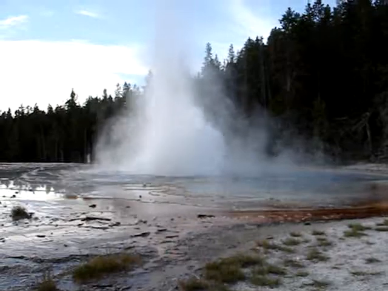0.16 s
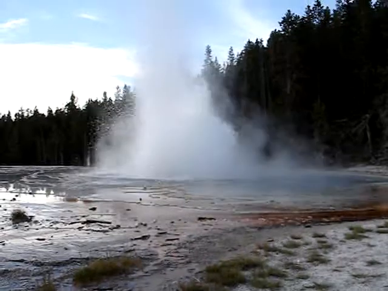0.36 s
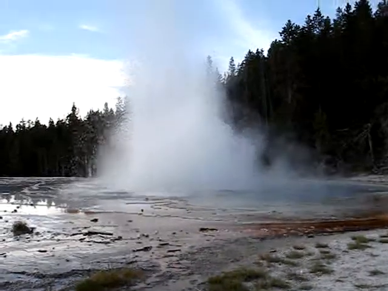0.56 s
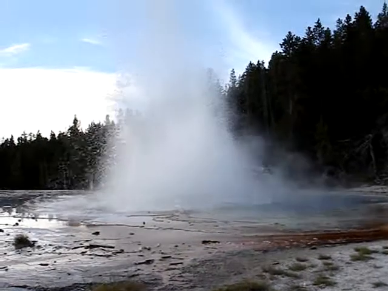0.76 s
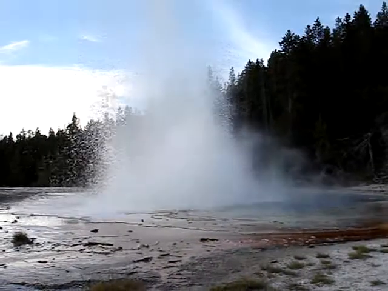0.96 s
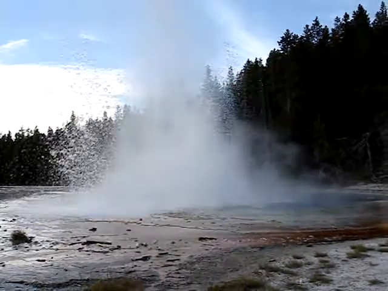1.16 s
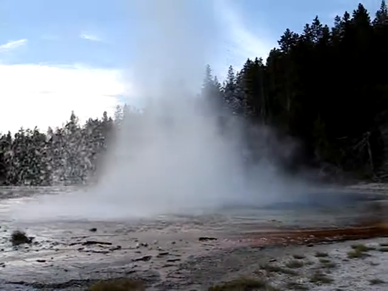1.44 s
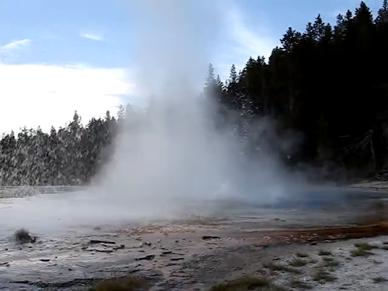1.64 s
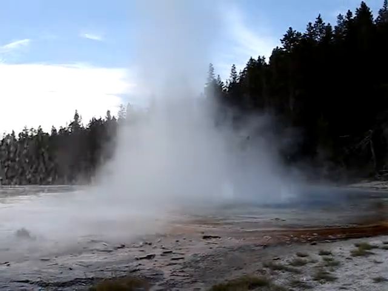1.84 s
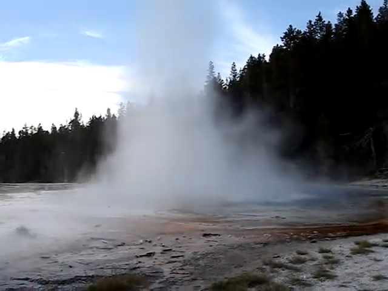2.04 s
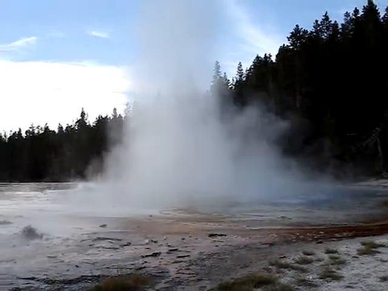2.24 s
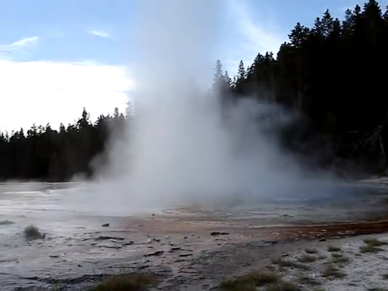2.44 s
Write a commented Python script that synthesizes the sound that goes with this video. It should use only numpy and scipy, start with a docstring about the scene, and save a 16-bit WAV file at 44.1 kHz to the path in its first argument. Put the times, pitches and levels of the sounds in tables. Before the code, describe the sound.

Geyser eruption: sudden roar of steam and water, dense falling splatter, sharp close drops, then faint simmer

```python
"""A sudden burst from a geyser's pool: a low roar of steam and water swells into a bright rush.
The thrown water then lands as a dense splatter that thins to single drops and stops.
The pool simmers steadily underneath: shaped noise, like the roar, rush and mist; drops are random impacts.
A gust brushes the microphone, and ticks of the nearest drops make the limiter duck."""
import sys
import numpy as np
from scipy import signal
from scipy.fft import rfft, irfft, next_fast_len
from scipy.io import wavfile
from scipy.ndimage import uniform_filter1d

SR = 44100
rng = np.random.default_rng(int(sys.argv[2]) if len(sys.argv) > 2 else 0)


def int16_out(signal):
    """Quantize to a 16-bit WAV file."""
    q = np.round(np.clip(np.atleast_2d(signal).T, -1, 1) * 32767)
    wavfile.write(sys.argv[1], SR, q.astype(np.int16))


N = 114660
T = np.arange(N) / SR   # time in seconds


def from_db(db):
    """Amplitude factor of a level in dB."""
    return 10 ** (np.asarray(db) / 20)


def rms_one(x):
    """Scale to an RMS of 1."""
    return x / np.sqrt(np.mean(x ** 2) + 1e-20)


def in_time(rows):
    """Each column of a table after the first (seconds), joined by straight lines over time."""
    seconds, *columns = np.transpose(rows)
    return [np.interp(T, seconds, column) for column in columns]


def drift(rate_hz):
    """Slow random movement with an RMS of 1: noise through two equal one-pole lowpasses."""
    step = 40   # samples between computed points
    r = np.exp(-2 * np.pi * rate_hz * step / SR)
    raw = rng.standard_normal(N // step + 2002)
    slow = signal.lfilter([1], [1, -2 * r, r * r], raw)[2000:]   # drop the filter's settling
    return np.interp(np.arange(N) / step, np.arange(len(slow)), rms_one(slow))


def shaped(x, spectrum):
    """Causal (minimum-phase) filter with the given spectrum; keeps the power of white noise."""
    size = 2 * next_fast_len(N)
    half = size // 2
    hz, db = np.transpose(spectrum)
    bin_hz = np.arange(half + 1) * SR / size
    gain = rms_one(from_db(np.interp(np.log(bin_hz + 1), np.log(hz), db)))
    # folding the cepstrum onto positive times gives the minimum phase
    cepstrum = irfft(np.log(gain))
    cepstrum[1:half] *= 2
    cepstrum[half + 1:] = 0
    response = np.exp(rfft(cepstrum))
    return irfft(rfft(x, size) * response)[:N]


def noise(spectrum):
    """White noise coloured by a spectrum, at an RMS of about 1."""
    return shaped(rng.standard_normal(N), spectrum)


def patter(per_s, spread_db):
    """Random impacts of uneven size and either sign, with a mean power of 1 at any rate."""
    size_db = spread_db * np.clip(rng.standard_normal(N), -3, 2)
    sizes = rms_one(from_db(size_db)) * rng.choice([-1, 1], N)
    chance = np.clip(per_s / SR, 1e-4, 1)   # of an impact on each sample
    return sizes * (rng.random(N) < chance) / np.sqrt(chance)


# The jet from the vent. Each row: time in seconds, level of the low roar in dB, level of the mid rush in dB.
JET_LEVELS = [(.08, -31.5, -45), (.17, -27.5, -30.5), (.26, -28, -33.5), (.41, -26.5, -32),
              (.52, -28, -28.5), (.67, -28.5, -24), (.74, -25.5, -22), (.84, -25, -23), (1.0, -24, -22),
              (1.16, -28, -22.5), (1.31, -31, -23.5), (1.46, -34, -30.5), (1.64, -37.5, -31.5),
              (1.76, -44.5, -37.5), (2.0, -45, -40.5), (2.22, -52.5, -44.5), (2.42, -57, -63),
              (2.6, -72, -83)]
# Slugs of water leaving the vent. Each row: centre in seconds, lift of the roar in dB, lift of the rush in dB.
SLUGS = [(0.096, 2.4, 5), (.172, 2.7, 2.9), (.247, 2, 1), (.32, 1.1, 1.2), (.402, 2.7, 0.45),
         (.728, 0.96, 2.9), (1.035, 0.45, 1.5)]
SLUG_S = 0.012   # standard deviation of each lift in time
# Colour of the roar. Each row: frequency in Hz, relative density in dB.
ROAR_SPECTRUM = [(30, -30), (80, -15.5), (150, -7.5), (250, -3), (400, -1.5), (650, 2.5), (900, -4),
                 (1400, -9), (3000, -12.5), (10000, -69.5)]
# Colour of the rush. Each row: frequency in Hz, relative density in dB.
RUSH_SPECTRUM = [(200, -22), (500, -7), (900, -2), (1300, -1), (2000, 0.5), (2800, 0), (4500, -7.5),
                 (10000, -29)]
GURGLE_SHARE = 0.085   # share of the roar's power


def jet(surge_db):
    """Steam tears through the pool in quick surges: a low, gurgling roar and a brighter rush."""
    roar_db, rush_db = in_time(JET_LEVELS)
    surge = surge_db * drift(22)
    for s, roar_lift_db, rush_lift_db in SLUGS:
        slug = np.exp(-.5 * ((T - s) / SLUG_S) ** 2)
        roar_db = roar_db + roar_lift_db * slug
        rush_db = rush_db + rush_lift_db * slug
    steady_roar = churn(ROAR_SPECTRUM, flutter_db=1.96, flutter_hz=40)
    roar = np.sqrt(1 - GURGLE_SHARE) * steady_roar + np.sqrt(GURGLE_SHARE) * gurgles()
    rush = churn(RUSH_SPECTRUM, flutter_db=1.56, flutter_hz=89.5)
    return from_db(roar_db + surge) * roar + from_db(rush_db + surge) * rush


def churn(spectrum, flutter_db, flutter_hz, count=6):
    """Turbulence: overlapping bands of noise that each flutter on their own."""
    source = rfft(noise(spectrum))
    bin_hz = np.arange(len(source)) * SR / N
    # band number of each bin, evenly spaced in log frequency
    place = np.interp(np.log(bin_hz + 1), np.log([200, 6400]), [0, count - 1])
    out = 0
    for k in range(count):
        band = irfft(source * np.maximum(1 - abs(place - k), 0), N)
        out = out + band * rms_one(from_db(flutter_db * drift(flutter_hz)))
    return out


GURGLES_PER_S = 120
GURGLE_LOW_HZ, GURGLE_HIGH_HZ = 319.8, 1311   # range of starting pitches
GURGLE_CYCLES, GURGLE_RISE = 4.86, 0.056   # decay time in cycles; fractional pitch rise per decay time


def gurgles():
    """Pockets of steam break the surface, each ringing for a few cycles at a rising pitch."""
    out = np.zeros(N)
    for start, place in rng.random((int(GURGLES_PER_S * N / SR), 2)):
        hz = GURGLE_LOW_HZ * (GURGLE_HIGH_HZ / GURGLE_LOW_HZ) ** place
        first = int(start * N)
        cycles = hz * T[:min(N - first, SR // 10)]
        age = cycles / GURGLE_CYCLES
        envelope = (1 - np.exp(-cycles)) * np.exp(-age)
        ring = np.sin(2 * np.pi * cycles * (1 + GURGLE_RISE * age / 2))
        out[first:first + len(age)] += envelope * ring
    return rms_one(out)


# Water falling around the pool. Each row: time in seconds, level of splashes in dB, level of fine spray in dB.
FALL_LEVELS = [(.08, -40.5, -54), (.17, -46, -43), (.28, -41, -44.5), (.5, -32.5, -35.5), (.73, -31, -29.5),
               (.81, -34, -30.5), (1.0, -23.5, -28), (1.15, -33.5, -27.5), (1.39, -27.5, -28.5),
               (1.52, -24, -30), (1.69, -25, -29.5), (1.77, -29, -32), (1.92, -27, -30.5),
               (2.04, -31.5, -31), (2.18, -31.5, -29.5), (2.31, -36, -34.5), (2.39, -43, -36.5),
               (2.44, -60, -63), (2.6, -68, -68)]
# How thickly the spray falls. Each row: time in seconds, drops per second.
DROP_RATE = [(0, 12400), (1.4, 12000), (2.15, 4000), (2.42, 1400)]
# Colour of the splashes. Each row: frequency in Hz, relative density in dB.
SPLASH_SPECTRUM = [(300, -27.5), (1000, -21), (2100, -12), (2800, -1.5), (3500, -2), (4600, -7),
                   (7000, -10), (10000, -20)]
# Colour of the spray. Each row: frequency in Hz, relative density in dB.
SPRAY_SPECTRUM = [(500, -26), (2000, -11), (3000, -11.5), (4200, -5.5), (5000, -3), (6200, -1.5),
                  (8200, -2), (10000, -10)]
DROP_SPREAD_DB, MIST_SHARE = 5, 0.26   # spread of drop sizes; share of the power that is smooth hiss


def falling_water(clump_db, clump_hz):
    """Drops land in clumps on pool and crust: ringing splashes and finer, brighter spray."""
    splash_db, spray_db = in_time(FALL_LEVELS)
    per_s, = in_time(DROP_RATE)
    clumps = from_db(clump_db * drift(clump_hz)) * splats(per_s / per_s.mean())
    layers = ((splash_db, SPLASH_SPECTRUM, .6 * per_s),   # splashes are fewer than spray drops
              (spray_db, SPRAY_SPECTRUM, per_s))
    out = 0
    for level_db, spectrum, rate in layers:
        drops = np.sqrt(1 - MIST_SHARE) * patter(rate, DROP_SPREAD_DB)
        mist = np.sqrt(MIST_SHARE) * rng.standard_normal(N)
        out = out + shaped((drops + mist) * from_db(level_db) * clumps, spectrum)
    return out


SPLATS_PER_S, SPLAT_S = 650, 0.00062   # mean rate of blobs; decay time of each shower
SPLAT_SHARE = 0.47   # share of the power


def splats(thickness):
    """Gain of the patter: each blob that lands sheds a brief shower of droplets."""
    blobs = patter(SPLATS_PER_S * thickness, spread_db=1.0) ** 2
    r = np.exp(-1 / (SPLAT_S * SR))
    showers = signal.lfilter([1 - r], [1, -r], blobs)
    showers = uniform_filter1d(showers, size=60)   # soften the onsets
    return np.sqrt(1 - SPLAT_SHARE + SPLAT_SHARE * np.maximum(showers, 0))


# Drops on the ground near the microphone.
# Each row: time in seconds, peak in dB ahead of the limiter, pitch of the tick in Hz.
NEAR_DROPS = [(1.4607, -11, 4500), (1.6767, -4, 3300), (1.682, -2, 3500), (1.7626, -8, 3100),
              (1.788, -8, 3000), (1.9177, -15, 3500), (1.9483, -15, 4800), (1.9951, -8.5, 3600),
              (2.024, -17, 4300), (2.0783, -11, 3800), (2.1534, -18, 4900), (2.0987, -16, 5200),
              (2.1621, -7.5, 4200), (2.1782, -13, 4900), (2.257, -15, 4700), (2.284, -9.5, 4230),
              (2.299, -12, 4600), (2.3009, -8, 4000), (2.3127, -9, 4630), (2.346, -18, 5600),
              (2.3650, -14, 5300), (2.3743, -18, 3100), (2.4026, -23.5, 2720), (2.411, -21, 5100),
              (2.4216, -21, 4900), (2.4282, -24, 6100), (2.53, -33.5, 3600)]
# Drops on the microphone's case. Each row: time in seconds, peak of the tick in dB ahead of the limiter,
# pitch of the tick in Hz, thud relative to the tick in dB.
CASE_DROPS = [(1.6575, -8, 2340, 1), (1.71, -12.5, 2940, -5), (1.831, -7.5, 3800, -14.5),
              (1.9673, -4.5, 2870, -11), (2.2306, -11.5, 3800, -9.5)]
THUD_S = 0.00013   # half-length of the thud


def near_drops():
    """Each close drop gives a sharp tick; those that hit the microphone's case also thud."""
    out = sum(from_db(db) * tick(T - s, hz) for s, db, hz in NEAR_DROPS)
    for s, db, hz, thud_db in CASE_DROPS:
        thud = np.exp(-((T - s) / THUD_S) ** 2)
        out = out + from_db(db) * (tick(T - s, hz) + from_db(thud_db) * thud)
    return -out   # the main peak points downward


TICK_CYCLES = 0.61   # half-length of the tick


def tick(t, hz):
    """A click of about one cycle around t = 0: a cosine under a bell-shaped envelope."""
    return np.exp(-(t * hz / TICK_CYCLES) ** 2) * np.cos(2 * np.pi * hz * t)


# Colour of the simmering pool. Each row: frequency in Hz, relative density in dB.
POOL_SPECTRUM = [(30, -20), (120, -12), (420, 1.5), (700, 4), (4000, -2.5), (5000, -3.5), (8000, -4.5),
                 (10000, -9.5)]
POOL_DB = -51.5


def simmering_pool():
    """The pool simmers as a steady, faint noise."""
    return from_db(POOL_DB) * noise(POOL_SPECTRUM)


# Wind at the microphone. Each row: time in seconds, level in dB.
WIND_LEVELS = [(.69, -73), (.735, -56), (.82, -73), (.88, -40), (.98, -38), (1.06, -40.5), (1.08, -49),
               (1.11, -35), (1.16, -68), (1.2, -50), (1.26, -76), (1.4, -51), (1.55, -64)]
# Colour of the wind. Each row: frequency in Hz, relative density in dB.
WIND_SPECTRUM = [(15, 2), (30, 3), (60, -5), (130, -13), (300, -28), (1000, -62)]


def wind(lumpy_db):
    """A lumpy gust on the microphone: low noise with a wandering level."""
    level_db, = in_time(WIND_LEVELS)
    return from_db(level_db + lumpy_db * drift(11)) * noise(WIND_SPECTRUM)


# Steady colour of ground and microphone. Each row: frequency in Hz, gain in dB, width in Hz.
COLOUR = [(664, 0, 36), (900, 4.5, 126), (1054, -3, 150), (1313, 4, 210), (1960, 1, 240)]


def coloured(x):
    """A few fixed resonant peaks and dips, one after another."""
    out = x
    for hz, db, width_hz in COLOUR:
        b, a = signal.iirpeak(hz, hz / width_hz, fs=SR)
        out = out + (from_db(db) - 1) * signal.lfilter(b, a, out)
    return out


START_S, ATTACK_S = .078, 0.0031   # the burst sets in; length of its linear fade-in


def scene():
    """The geyser at a distance, close drops and wind at the microphone, the same on both channels."""
    geyser = jet(surge_db=0.1) + falling_water(clump_db=1.4, clump_hz=109) + simmering_pool()
    onset = np.clip((T - START_S) / ATTACK_S, 0, 1)   # silence before the burst
    mono = (coloured(geyser) + near_drops() + wind(lumpy_db=-3.0)) * onset
    return np.array([mono, mono])


LIMIT_DB, RELEASE_DB_PER_S, LIMITER_ATTACK_S = -7, 104, 0.00029
CUTOFF_HZ = 10080


def record(dry):
    """A mono recorder: peaks duck the gain, which soon recovers; peaks are rounded and the top is cut."""
    over_db = np.maximum(20 * np.log10(abs(dry[0]) + 1e-9) - LIMIT_DB, 0)
    # hold each peak, then let it fall at the release rate
    release_db = RELEASE_DB_PER_S * T
    held_db = np.maximum.accumulate(over_db + release_db) - release_db
    r = np.exp(-1 / (LIMITER_ATTACK_S * SR))
    duck_db = signal.lfilter([1 - r], [1, -r], held_db)
    limited = 0.61 * np.tanh(dry * from_db(-duck_db) / 0.63)
    lowpass = signal.ellip(12, .2, 80, CUTOFF_HZ, fs=SR, output="sos")
    return signal.sosfilt(lowpass, limited)


dry = scene()
out = record(dry)
int16_out(out)
```